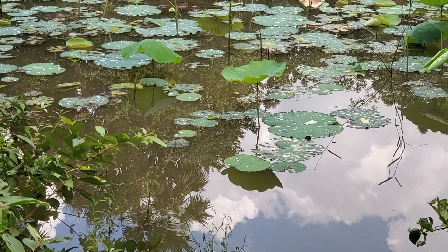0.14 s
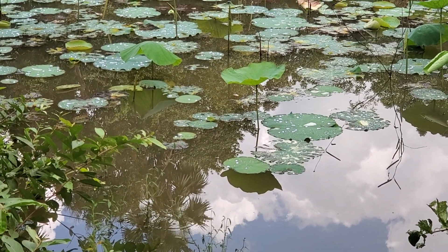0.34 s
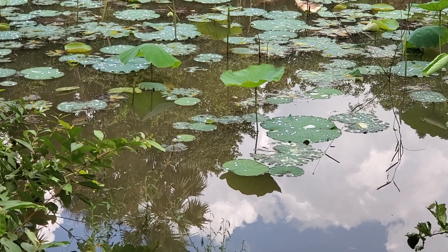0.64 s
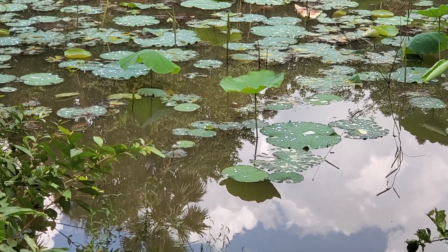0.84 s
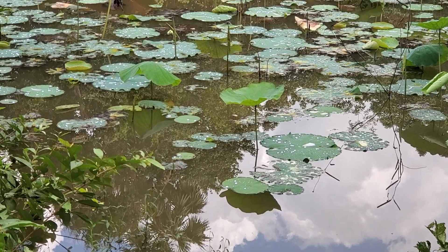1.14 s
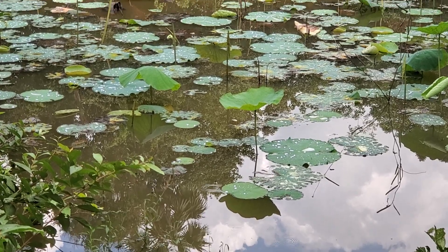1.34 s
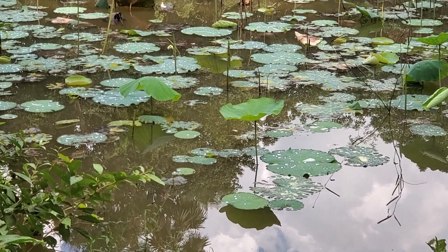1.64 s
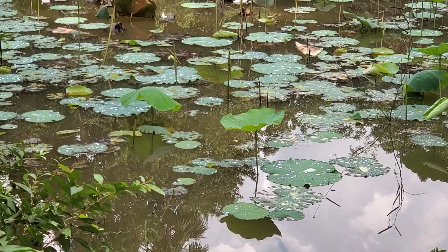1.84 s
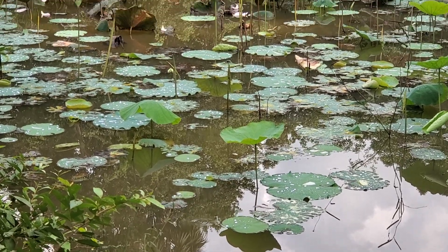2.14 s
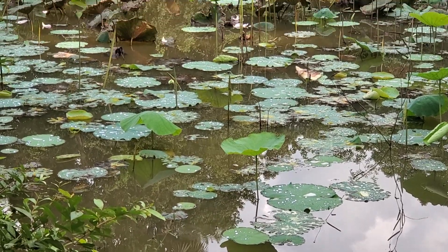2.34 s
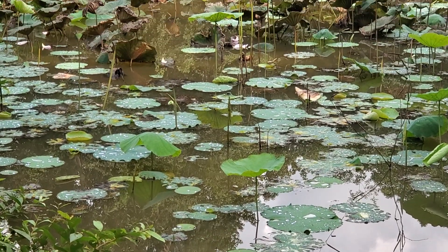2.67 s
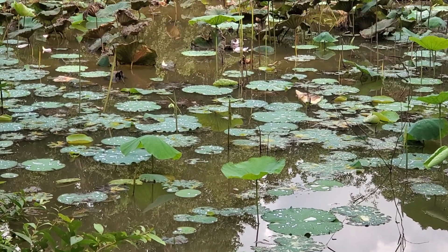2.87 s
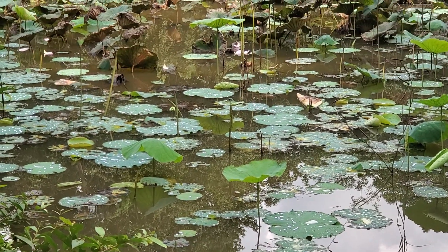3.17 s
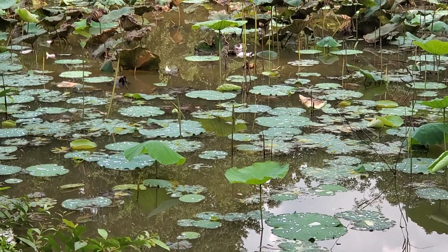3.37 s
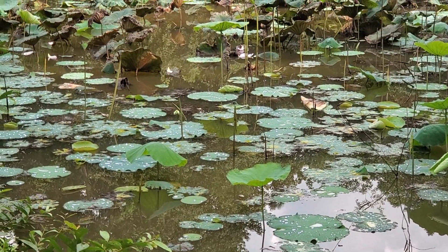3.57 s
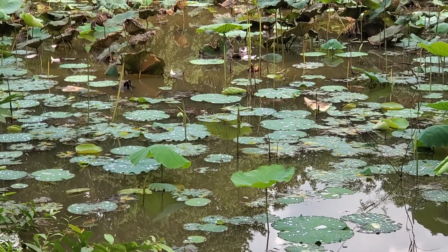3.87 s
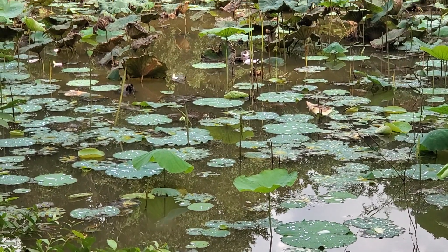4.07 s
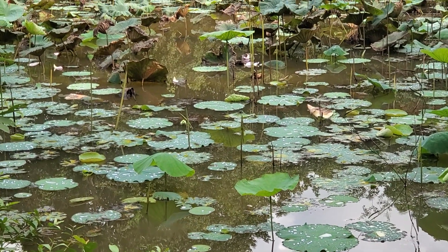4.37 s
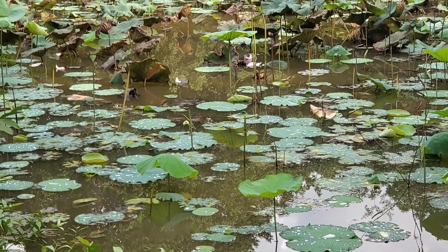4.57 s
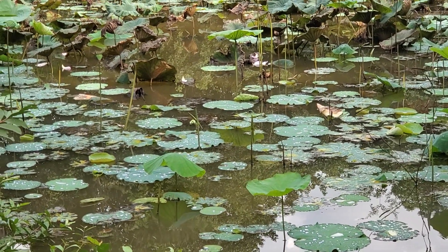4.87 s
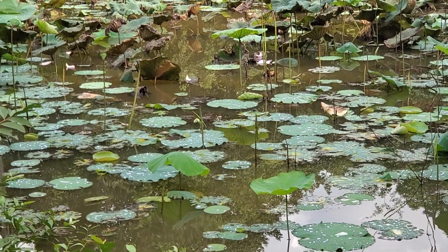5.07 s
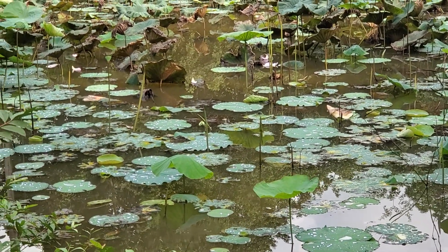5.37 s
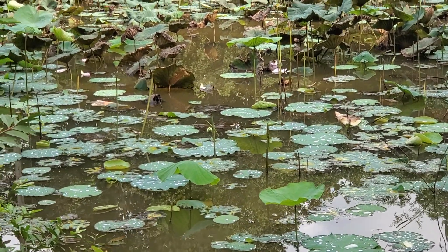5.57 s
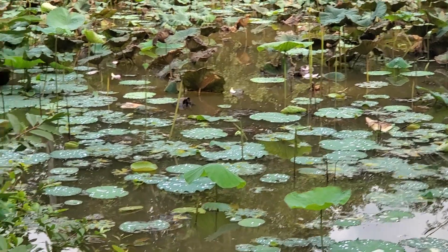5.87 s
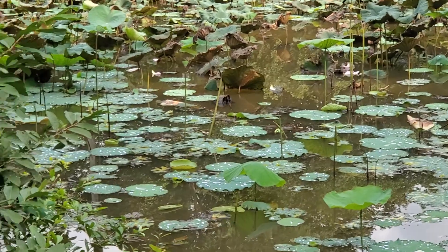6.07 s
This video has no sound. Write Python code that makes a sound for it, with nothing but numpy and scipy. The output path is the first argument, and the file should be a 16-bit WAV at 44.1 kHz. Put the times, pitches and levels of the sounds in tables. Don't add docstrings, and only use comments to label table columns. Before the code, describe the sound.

From 0 to 6.2 seconds, a cricket near the left sings quick two- and three-stroke chirps around 7 kHz, almost a trill, faltering after 5. Bush crickets buzz: one near 11 kHz in half-second phrases with tiny gaps, another near 8 kHz swelling about once a second and breaking off; a far chorus hisses behind. Low road rumble swells in the first half second and stays. A distant motorbike drones, rising in pitch until 1.5, steady to 3.3, then dropping and dying by 3.9. Grass scuffs at 0.6-0.8, 1.6, 2.3 and 3.3, with a small knock at 0.74 and ticks around 2.9. A far goat bleats in quavering syllables at 3.8-4.4 and again at 5.3-5.7. A dull bump at left comes at 4.9, leaves rustle around 5.0-5.2, a barely audible very high whistle slides down at 5.7, and a sharp left tap clicks at 5.95.

```python
import sys
import numpy as np
from scipy import signal
from scipy.fft import rfft, irfft, next_fast_len
from scipy.io import wavfile
from scipy.ndimage import uniform_filter1d

SR = 44100
rng = np.random.default_rng(int(sys.argv[2]) if len(sys.argv) > 2 else 0)


def natural_amplitude(level_db):
    exponent = np.asarray(level_db, float) / 20
    return 10 ** exponent


def wav_out(sig):
    wavfile.write(sys.argv[1], SR, np.round(np.clip(np.atleast_2d(sig).T, -1, 1) * 32767).astype(np.int16))


N = 274302
TIME = np.arange(N) / SR
SIZE = next_fast_len(N + SR // 4)
BINS_HZ = np.maximum(np.arange(SIZE // 2 + 1) * SR / SIZE, 1.)

STROKE_GAP_S = .0122
HIGH_STROKE_HZ = 156.
SWELL_DB = 20


def unit(x):
    return x / np.sqrt(np.mean(x ** 2))


def play(table):
    s, *columns = np.transpose(table)
    return [np.interp(TIME, s, c) for c in columns]


def fade(start_s, end_s, edge_s):
    return np.clip(np.minimum(TIME - start_s, end_s - TIME) / edge_s, 0, 1)


def swells(rows):
    out = 0
    for s, db, rise, fall in rows:
        out = out + natural_amplitude(db - SWELL_DB * np.maximum((s - TIME) / rise, (TIME - s) / fall))
    return out


def along(points):
    hz, value = np.transpose(points)
    return np.interp(np.log(BINS_HZ), np.log(hz), value)


def shape(x, gain):
    return irfft(rfft(x, SIZE) * gain, SIZE)[..., :N]


def ring(modes):
    return sum(natural_amplitude(db) / (1 + 1j * (BINS_HZ - hz * hz / BINS_HZ) / width) ** 3 for hz, width, db in modes)


def walk(rate):
    k = int(SR / rate)
    held = np.repeat(rng.standard_normal(N // k + 1), k)
    return 1.3 * uniform_filter1d(uniform_filter1d(held, k), k)[:N]


def pan(x, db):
    return x * natural_amplitude(np.array([db, -db]).reshape(2, -1) / 2)


def lag(x, count):
    return np.array([x, np.roll(x, count)])


def leaves(x, t60_s):
    t = np.arange(SR // 5) / SR
    tail = rng.standard_normal((2, 2, len(t))) * np.exp(-np.log(1000) * t / t60_s)
    tail = tail / np.sqrt(np.sum(tail ** 2, axis=2, keepdims=True))
    one, other = shape(x, rfft(tail, SIZE))
    sway = 2 * np.pi * TIME * .7 + walk(3)
    return np.cos(sway) * one + np.sin(sway) * other


def spread_noise(points, swell_db, flicker_db):
    # frequency in Hz, likeness of the two ports from -1 to 1
    likeness = [(30, 0.95), (130, 0.91), (300, 0.66), (640, 0.54), (1400, -0.46), (3000, 0.05),
                (6000, -0.13), (16000, -0.25)]
    # frequency in Hz, left minus right in dB
    lean_points = [(30, 0), (150, -0.5), (300, 2), (700, 2.5), (1500, 1), (9000, 4), (14000, 2)]
    alike, lean = np.clip(along(likeness), -.9, .99), along(lean_points)
    mid, side = rfft(rng.standard_normal((2, SIZE)))
    pair = np.array([1, -1]).reshape(2, 1)
    both = np.sqrt(1 + alike) * mid + pair * np.sqrt(1 - alike) * side
    low_hz, high_hz = points[0][0], points[-1][0]
    spec = natural_amplitude(along(points) + pair * lean / 2) * both * (BINS_HZ > low_hz) * (BINS_HZ < high_hz)
    out, swell, half_octave = 0, walk(0.6), 2 * np.log2(BINS_HZ)
    for band in range(int(2 * np.log2(low_hz)), int(2 * np.log2(high_hz)) + 2):
        part = irfft(spec * np.clip(1 - abs(half_octave - band), 0, 1), SIZE)[:, :N]
        out = out + part * natural_amplitude(swell_db * swell + flicker_db * walk(8))
    return unit(out)


def background():
    # time in seconds, tyre roar in dB, rumble in dB
    road = [(0, -63.5, -61), (.15, -64.5, -49.5), (.5, -63, -44.5), (1.1, -62, -46), (2.25, -59, -45.5),
            (3.55, -64.5, -46.5), (4.3, -63, -48), (5.0, -63.5, -47.5), (5.5, -62.5, -46.5),
            (6.22, -64.5, -48.5)]
    # frequency in Hz, strength in dB per Hz
    rumble_colour = [(13, -42), (22, 4.5), (37, -13), (76, -2), (95, -4), (114, -10.5), (152, -14.5),
                     (168, -20), (208, -37), (450, -31), (580, -80), (990, -120)]
    roar_colour = [(120, -22.5), (200, -4), (277, -14.5), (343, -13), (431, -14.5), (463, -12), (762, -10),
                   (1270, -14.5), (2280, -26.5), (3070, -44), (5200, -42), (6000, -37), (7800, -87),
                   (13200, -120)]
    leaf_colour = [(1100, -9), (1650, 0.5), (2200, -4.5), (3000, -3.5), (3900, -1.5), (5400, -6),
                   (9500, -19), (15760, -15)]
    insect_colour = [(5900, -21), (6500, -8), (8300, -7), (9400, -23), (10500, -5), (12300, -.5),
                     (13300, -4), (14500, -1), (15760, -6)]
    # peak in seconds, peak in dB, rise in seconds, fall in seconds
    puffs = [
        (0, -78.5, .5, 0.85),
        (1.8, -79, 4.3, 2.1),
        (2.94, -71, 0.077, 0.21),
        (3.1, -79.5, 0.22, 0.29),
        (4.77, -79, 0.65, 0.94),
        (4.98, -62, 0.095, 0.3),
        (5.2, -59.5, 0.18, 0.25),
        (5.68, -68, 0.039, 0.056),
        (6.0, -64.5, 0.33, 3.2),
    ]
    # time in seconds, level in dB
    whine_curve = [(0, -82), (.8, -72), (1.3, -70.5), (1.9, -68.5), (2.3, -66.5), (2.8, -76), (3.5, -78),
                   (4.2, -93), (6.22, -95)]
    # frequency in Hz, width in Hz, level in dB
    tread = [(2220, 900, 0)]
    roar_db, rumble_db = play(road)
    rumble = natural_amplitude(rumble_db) * spread_noise(rumble_colour, 0.82, 1.4)
    roar = natural_amplitude(roar_db + 2.5) * spread_noise(roar_colour, 0.55, 1.15)
    rustle = (swells(puffs) + natural_amplitude(-84.5)) * spread_noise(leaf_colour, .3, 1.2) * natural_amplitude(1.6 * walk(70))
    whine = unit(shape(rng.standard_normal((2, N)), ring(tread)))
    whine = whine * natural_amplitude(play(whine_curve)[0] + 1.5 * walk(9.4))
    hiss = natural_amplitude(-64.5) * spread_noise(insect_colour, 1.0, 1.0)
    return rumble + roar + whine + rustle + hiss


def motorbike():
    # time in seconds, firing rate in Hz, level in dB, muffling of the upper multiples in dB
    ride = [(0, 35.93, -40, -12.5), (.13, 37.32, -57.5, 0), (.5, 39.43, -41.5, -10),
            (.62, 39.45, -46.5, -8), (.8, 40.84, -44.5, -6), (1.15, 41.98, -47, -6.5), (1.24, 42.4, -57, 3),
            (1.35, 42.7, -39, -14.5), (1.53, 43.16, -43.5, -9.5), (1.71, 43.04, -40, -13),
            (1.89, 43.24, -46, -9.5), (2.07, 43.07, -36.5, -22), (2.25, 43.18, -35, -25),
            (2.44, 43.6, -41.5, -18.5), (2.9, 43.23, -42.5, -17.5), (3.26, 43.44, -46, -14.5),
            (3.55, 34.4, -65.5, 5), (3.9, 30.3, -56, -13)]
    # multiple of the firing rate, level in dB, share of the muffling
    orders = [(1, -14, 0.0062), (2, -0.97, 0.013), (3, -10, 0.59), (4, 0.7, 1.224), (5, -5, 1.05),
              (6, -18, 0.6), (7, -22, 0.88), (8, -27, 0.25)]
    # frequency in Hz, width in Hz, level in dB
    exhaust = [(203, 173, 0)]
    pipe_hz, pipe_width_hz, pipe_db = 268.2, 7.4, 6
    hz, db, muffle_db = play(ride)
    turn = 2 * np.pi * np.cumsum(hz * (1 + 0.0027 * walk(8.68))) / SR
    drone = 0
    for k, order_db, share in orders:
        boost_db = pipe_db / (1 + ((k * hz - pipe_hz) / pipe_width_hz) ** 2)
        flutter_db = (0.46 + 0.38 * k) * walk(7.034)
        level_db = db + order_db + boost_db + share * muffle_db + flutter_db
        drone = drone + natural_amplitude(level_db) * np.sin(round(k) * turn + 7 * rng.random())
    puff = unit(shape(rng.standard_normal((2, N)), ring(exhaust)))
    puff = puff * natural_amplitude(uniform_filter1d(db + muffle_db, SR // 4) - 8.5)
    return (np.sqrt(2) * drone + puff) * np.clip((ride[-1][0] - TIME) / 0.31, 0, 1)


def buzz(wing, stroke_hz, tooth_hz, duty, scatter_db):
    stroke = np.cumsum(stroke_hz * (1 + 0.004 * walk(5.41))) / SR % 1
    teeth = np.cumsum(tooth_hz * (1 + .3 * walk(400))) / SR
    clicks = (np.diff(np.floor(teeth), prepend=0) > 0) * natural_amplitude(scatter_db * rng.standard_normal(N))
    closing = np.sin(np.pi * np.clip(stroke / duty, 0, 1)) ** 2
    return unit(shape(clicks * closing, ring(wing)))


def high_note():
    stroke_hz = HIGH_STROKE_HZ * (1 + 0.0066 * walk(4.4))
    throb = 1 + 0.42 * np.cos(2 * np.pi * np.cumsum(stroke_hz) / SR)
    note = np.sin(2 * np.pi * np.cumsum(11162 * (1 + .004 * walk(14))) / SR)
    return unit(throb * note * natural_amplitude(0.85 * walk(9))) * natural_amplitude(-10)


def bush_crickets():
    # frequency in Hz, width in Hz, level in dB
    high_wing = [(10980, 1180, 4), (11330, 540, 6), (12600, 610, -23)]
    low_wing = [(7950, 1080, 5), (8300, 1800, -9)]
    far_wing = [(7206, 810, 0)]
    # start in seconds, end in seconds, level at the end in dB
    high_phrases = [(-.2, 0.316, -58.5), (0.384, .93, -60.5), (1.001, 1.54, -58.5), (1.6, 2.169, -59),
                    (2.23, 2.812, -58.5), (2.862, 3.439, -57.5), (3.528, 4.112, -58.5), (4.18, 4.75, -56.5),
                    (4.878, 5.387, -58), (5.45, 5.997, -55.5), (6.043, 6.507, -54.5)]
    # peak in seconds, peak in dB
    low_phrases = [(.45, -64.5), (1.349, -64.5), (2.29, -61), (3.19, -61.5), (4.12, -64), (5.04, -64.5),
                   (5.91, -66.5)]
    # time in seconds, level in dB
    far_curve = [(0, -69.5), (1.75, -64.5), (2.3, -63.5), (3.7, -63.5), (4.7, -64.5), (6.22, -61.5)]
    high_gain = 0
    for start, end, db in high_phrases:
        rising = natural_amplitude(np.interp(TIME, [start, end], [db - 4, db]))
        high_gain = high_gain + fade(start, end, 0.019) * pan(rising, -2.5)
    high = buzz(high_wing, HIGH_STROKE_HZ, 930., 1.0, 0.25) * natural_amplitude(-4.5)
    low_gain = swells([(s, db, SWELL_DB / 20, SWELL_DB / 181) for s, db in low_phrases])
    low = buzz(low_wing, 222., 1300., 0.93, 1.1) * low_gain
    far = buzz(far_wing, 165., 1500., 0.71, 5.2) * natural_amplitude(play(far_curve)[0] + 4.8 * walk(25.01))
    out = high_gain * (lag(high, count=-4) + leaves(high, .022) + lag(high_note(), count=-4))
    out += pan(natural_amplitude(-1.0) * lag(low, count=4) + natural_amplitude(-4.5) * leaves(low, 0.11), 5.1)
    return out + pan(natural_amplitude(-7.5) * far + natural_amplitude(-.5) * leaves(far, 0.13), 5.2)


def chirps():
    # start in seconds, number of chirps of three strokes, then of two, then of three again
    runs = [(.015, 3, 0, 0), (.203, 4, 0, 0), (.38, 2, 1, 3), (.63, 1, 1, 3), (.831, 0, 5, 0),
            (.989, 7, 0, 0), (1.293, 3, 1, 2), (1.539, 0, 1, 1), (1.677, 1, 1, 3), (1.886, 7, 0, 0),
            (2.189, 2, 3, 1), (2.416, 1, 2, 1), (2.561, 0, 2, 1), (2.671, 2, 2, 2), (2.903, 0, 3, 1),
            (3.042, 5, 0, 0), (3.261, 4, 3, 0), (3.529, 4, 2, 2), (3.846, 0, 1, 3), (4.009, 10, 0, 0),
            (4.442, 9, 1, 2), (5.013, 1, 1, 0), (5.104, 3, 0, 0), (5.342, 6, 0, 0), (5.81, 0, 1, 1),
            (5.974, 0, 2, 0), (6.098, 1, 1, 0)]
    # start in seconds, strokes
    lone_chirps = [(.142, 4), (1.611, 2), (1.642, 1), (4.958, 4), (5.239, 4), (5.294, 3), (5.622, 4),
                   (5.677, 4), (5.744, 5), (5.898, 4), (6.054, 3), (6.19, 3)]
    rest_s = .0183
    out = list(lone_chirps)
    for s, threes, twos, more in runs:
        for strokes in [3] * threes + [2] * twos + [3] * more:
            out.append((s, strokes))
            s += (strokes - 1) * STROKE_GAP_S + rest_s
    return out


def cricket():
    # time in milliseconds, pitch in Hz, level in dB
    stroke_curve = [(-4, 6430, 7), (-4, 6410, -2), (-0.72, 6874, -5.5), (-0.5, 7114, -5.5),
                    (3.5, 7040, -12), (4.5, 7500, -28), (8, 14000, -51)]
    # time in seconds, level in dB
    song_curve = [(0, -59), (1.5, -58), (2.4, -57), (3.6, -59), (4.4, -57.5), (5.0, -55.5), (5.5, -57.5),
                  (5.8, -62.5), (6.22, -68)]
    ms, hz, db = np.transpose(stroke_curve)
    edges = ms * SR / 1000
    t = np.arange(int(edges[0]), int(edges[-1]))
    turn = 2 * np.pi * np.cumsum(np.interp(t, edges, hz)) / SR
    swell = natural_amplitude(np.interp(t, edges, db)) * np.sqrt(np.hanning(len(t)))
    out = np.zeros(N + SR)
    for first, strokes in chirps():
        for i in range(strokes):
            late, tune, size, phase = rng.standard_normal(4)
            at = int((first + STROKE_GAP_S * i + 0.0006 * late) * SR) + t
            out[at] += natural_amplitude(1.14 * size) * swell * np.sin(turn * (1 + 0.0051 * tune) + 9 * phase)
    song = unit(shape(out[:N], ring([(6480, 7000, 0)]))) * natural_amplitude(play(song_curve)[0])
    return natural_amplitude(0.5) * pan(lag(song, count=5), 15.6) + natural_amplitude(-19) * leaves(song, 0.1)


def scuffs():
    # peak in seconds, peak in dB, rise in seconds, fall in seconds
    scuff_rows = [
        (.606, -66.5, 0.11, 0.049),
        (.75, -59, 0.06, 0.082),
        (1.582, -59.5, 0.053, 0.11),
        (2.306, -61.5, .15, 0.22),
        (2.944, -68.5, 0.12, 0.055),
        (3.072, -79, 0.048, 0.073),
        (3.258, -62.5, 0.062, 0.064),
    ]
    # frequency in Hz, strength in dB per Hz
    grass = [(500, -32), (900, -8), (1500, 0.5), (2240, 1.5), (3300, -0.5), (6000, -8.5), (9500, -16),
             (15760, -15)]
    sizes_db = 2 * rng.exponential(size=(2, N)) + 1.5 * walk(90)
    grains = rng.standard_normal((2, N)) * natural_amplitude(sizes_db) * (rng.random(N) < .2)
    grains = grains - 0.096 * grains[::-1]
    crackle = unit(shape(grains, natural_amplitude(along(grass)) * (BINS_HZ < grass[-1][0])))
    return natural_amplitude(8.5) * swells(scuff_rows) * crackle


def taps():
    # start in seconds, peak in dB, ring in Hz (minus pushes first),
    # time to fall by 60 dB in seconds, left minus right in dB
    knocks = [(.7362, -37, 1900, 0.012, 3), (0.7361, -42, 1300, 0.004, 1), (0.7363, -48, -495, .01, 0),
              (.749, -50, 2050, 0.02, 4), (.754, -50, 2500, 0.012, 4), (.765, -51, 1900, .015, 4),
              (.772, -51, 2100, .018, 4), (.586, -56, 2200, .01, 5), (.611, -53, 2880, 0.014, 11),
              (1.742, -51, 2470, 0.005, 3), (4.68, -45.5, 185, 0.017, 18), (4.824, -52.5, 607, 0.018, 16),
              (4.911, -47.5, 650, .015, 17), (4.912, -34, 94.5, .12, 16), (5.9155, -49, 700, 0.011, 20),
              (5.9539, -36, -700, 0.004, 20), (5.9546, -31, 620, 0.009, 22.5)]
    # time in seconds, peak in dB, lowest frequency in Hz, left minus right in dB, spread in ms
    ticks = [(.6105, -49, 3000, 0, .2), (2.884, -48, 2000, 0, 1.2), (2.9211, -43, 10100, -4, 2.22),
             (2.938, -39, 10500, -4, 1.6), (2.938, -43, 1500, -2, 0.45), (2.975, -51, 3000, 0, 1.2),
             (3.066, -47.5, 3500, -5, 3.34), (3.13, -54, 3496, 0, 1.5), (5.9157, -38, 11000, 26, 0.25),
             (5.9363, -46, 13000, 17, .4), (5.9435, -51, 13000, 11, .6), (5.949, -50, 13000, 11, .6),
             (5.9544, -25.5, 4600, 20.5, 0.2), (5.068, -50, 4500, 6, .8)]
    out, t = np.zeros((2, N + SR)), np.arange(SR // 5) / SR
    for s, db, hz, t60, pan_db in knocks:
        body = -np.exp(-np.log(1000) * t / t60) * np.sin(2 * np.pi * hz * t)
        out[:, int(s * SR):][:, :len(t)] += pan(natural_amplitude(db) * body / abs(body).max(), pan_db)
    centre_s = .01
    snap = np.arange(len(t)) == int(centre_s * SR)
    for s, db, low_hz, pan_db, spread_ms in ticks:
        grit = rng.standard_normal(len(t))
        envelope = np.exp(-abs(t - centre_s) * 1000 / max(spread_ms, .1))
        tick = (.4 * grit + .4 / spread_ms * snap) * envelope
        tick = signal.sosfilt(signal.butter(3, [low_hz, 16500], "band", fs=SR, output="sos"), tick)
        out[:, int((s - centre_s) * SR):][:, :len(t)] += pan(natural_amplitude(db) * tick / abs(tick).max(), pan_db)
    return out[:, :N]


def goat():
    # start in seconds, length in seconds, start pitch in Hz, held pitch in Hz, level in dB
    bleats = [(3.76, .085, 585, 608, -64), (3.84, .165, 585, 572, -63), (4.0, .06, 572, 578, -68),
              (4.04, .075, 545, 525, -64), (4.115, .1, 545, 540, -67), (4.215, .05, 535, 530, -71),
              (4.31, .08, 530, 515, -73), (5.315, .05, 500, 545, -67), (5.355, .09, 575, 590, -60),
              (5.44, .06, 585, 585, -65), (5.5, .075, 585, 590, -66), (5.645, .07, 588, 594, -71)]
    # frequency in Hz, level in dB
    throat = [(500, 2), (600, 3), (1050, -1), (1200, 0), (1600, -19), (1750, -15), (2100, -22), (2290, -11),
              (2350, -22)]
    hz_points, db_points = np.transpose(throat)
    wobble, quaver_db = walk(35), 3 * walk(30)
    out = 0
    for s, length, start_hz, held_hz, db in bleats:
        settling = np.exp(-np.clip(TIME - s, 0, 1) / (0.33 * length))
        hz = held_hz + (start_hz - held_hz) * settling
        turn = 2 * np.pi * np.cumsum(hz * (1 + .012 * wobble)) / SR
        voice = 0
        for k in (1, 2, 3, 4):
            voice = voice + natural_amplitude(np.interp(k * held_hz, hz_points, db_points)) * np.sin(k * turn)
        out = out + fade(s, s + length, 0.013) * natural_amplitude(db + quaver_db) * voice
    return out + natural_amplitude(-2.5) * leaves(out, .5)


def whistle():
    # time in seconds, pitch in Hz, level in dB
    glide = [(5.635, 12800, -78), (5.65, 14000, -76), (5.672, 15000, -73), (5.7, 13900, -74),
             (5.73, 13250, -75), (5.77, 13100, -78), (5.81, 12500, -77)]
    hz, db = play(glide)
    gain = natural_amplitude(db - 3 + 2 * walk(60)) * fade(glide[0][0], glide[-1][0], .01)
    return gain * np.sin(2 * np.pi * np.cumsum(hz) / SR)


def scene():
    insects = bush_crickets() + cricket()
    return background() + motorbike() + insects + scuffs() + taps() + goat() + whistle()


def low_pass(x):
    return signal.sosfilt(signal.butter(12, 16850, fs=SR, output="sos"), x)


def record(dry):
    heard = shape(dry, (BINS_HZ < 15760) / np.sqrt(1 + (34.3 / BINS_HZ) ** 16))
    return low_pass(heard)


dry = scene()
out = record(dry)
wav_out(out)
```